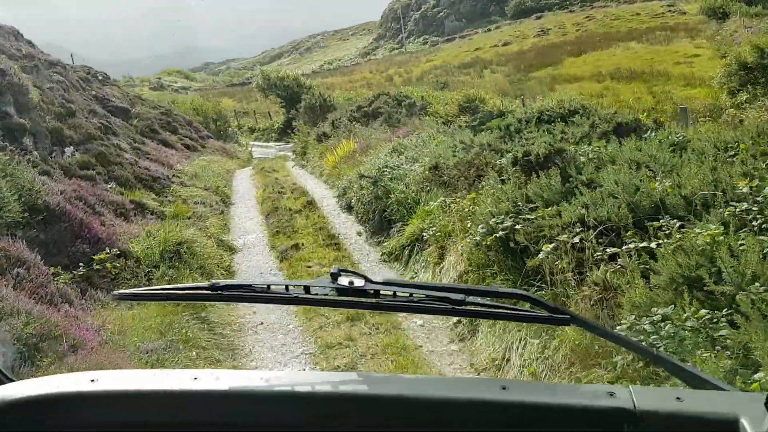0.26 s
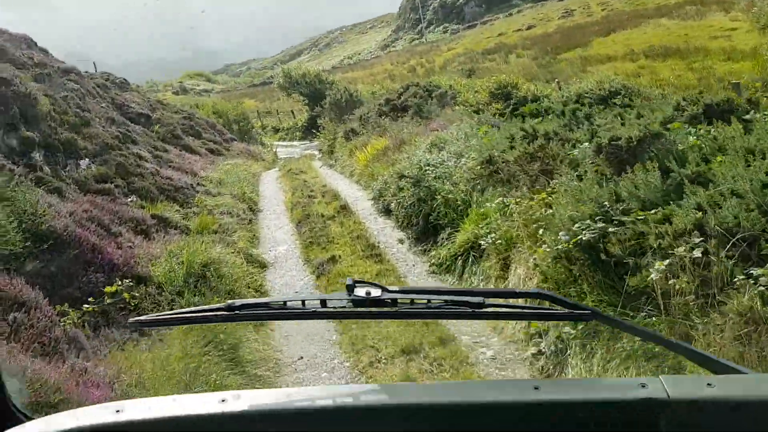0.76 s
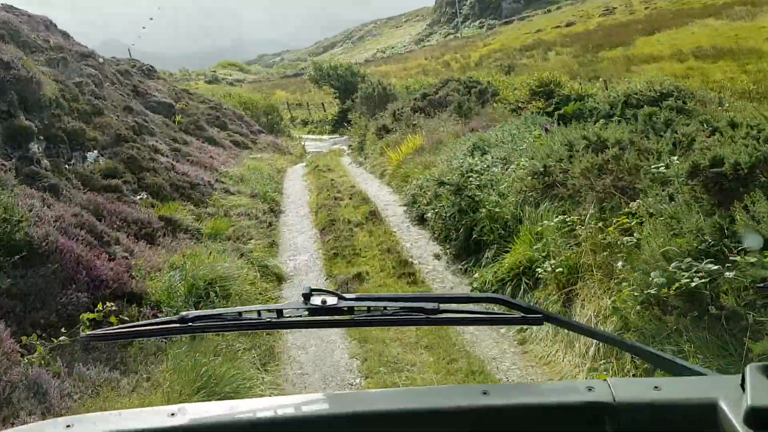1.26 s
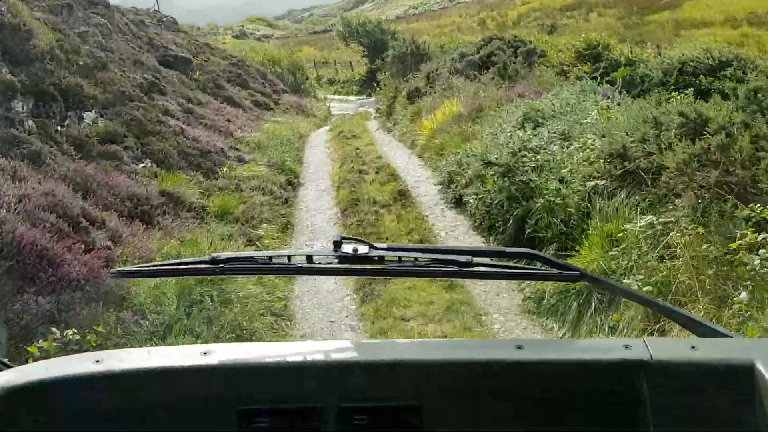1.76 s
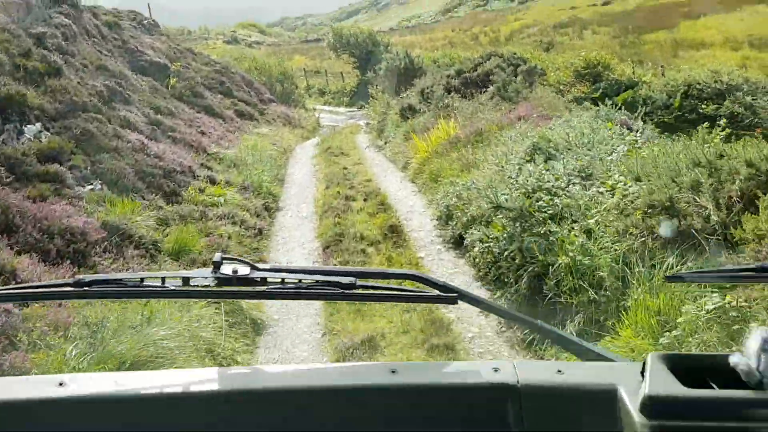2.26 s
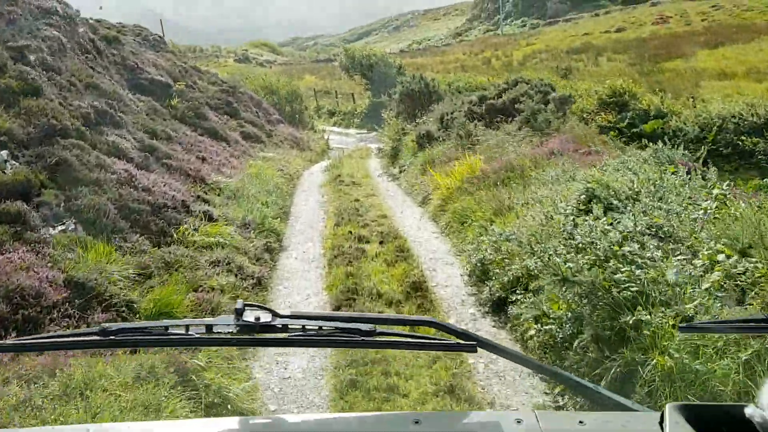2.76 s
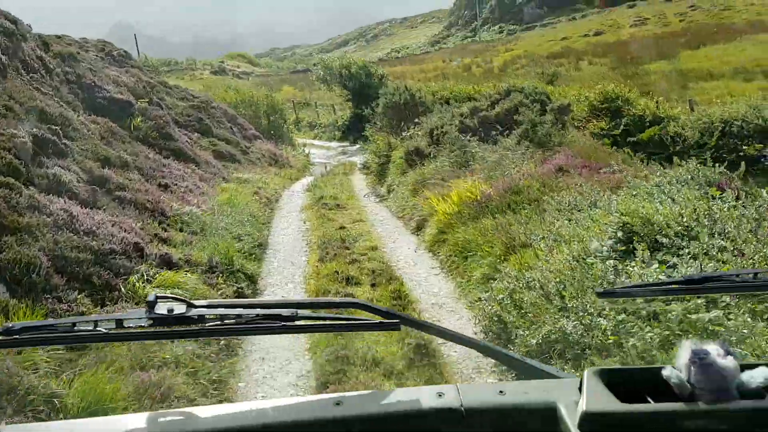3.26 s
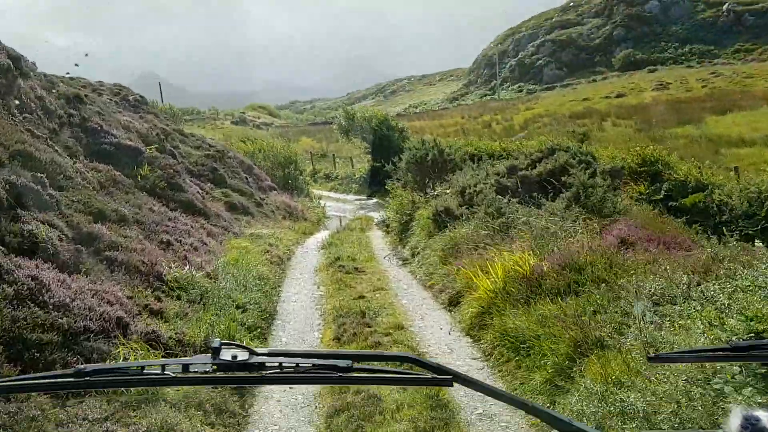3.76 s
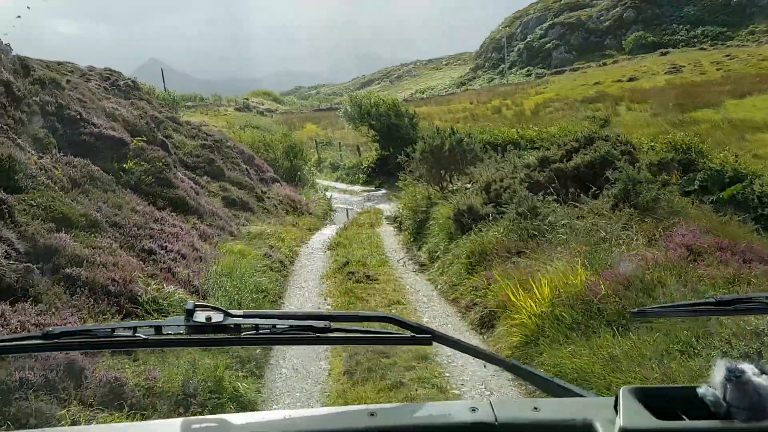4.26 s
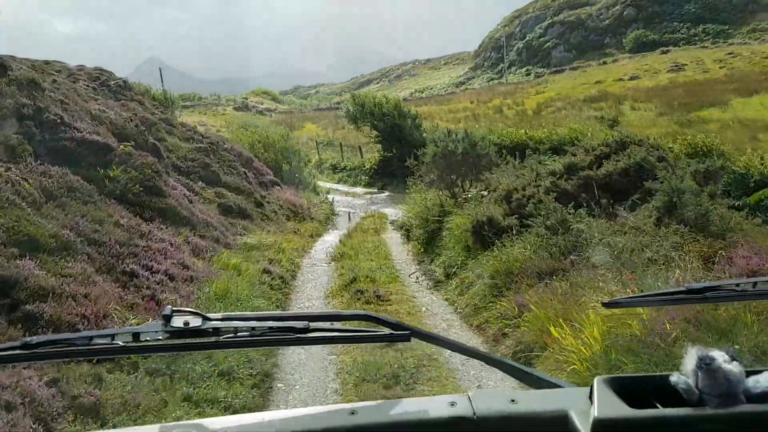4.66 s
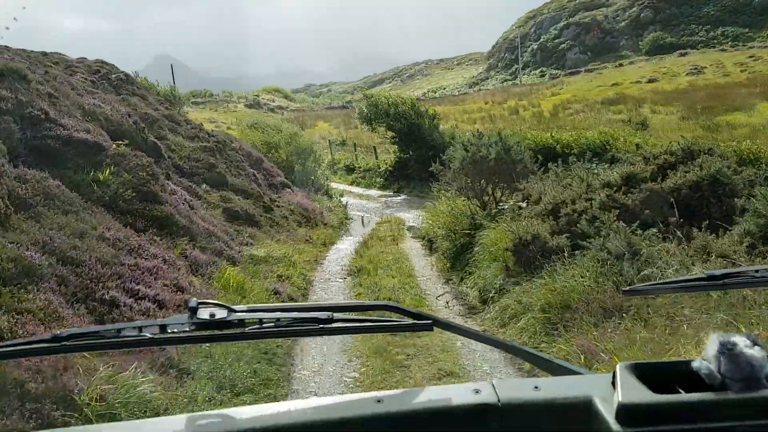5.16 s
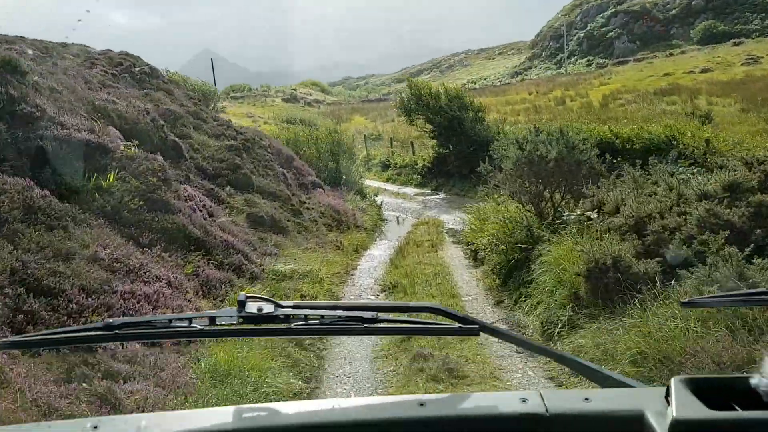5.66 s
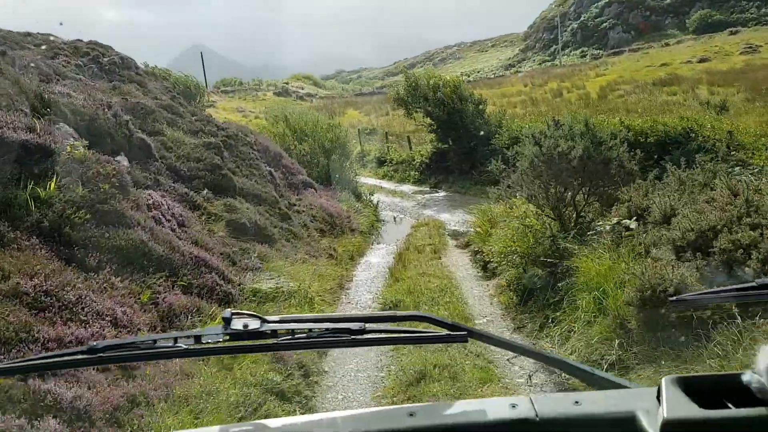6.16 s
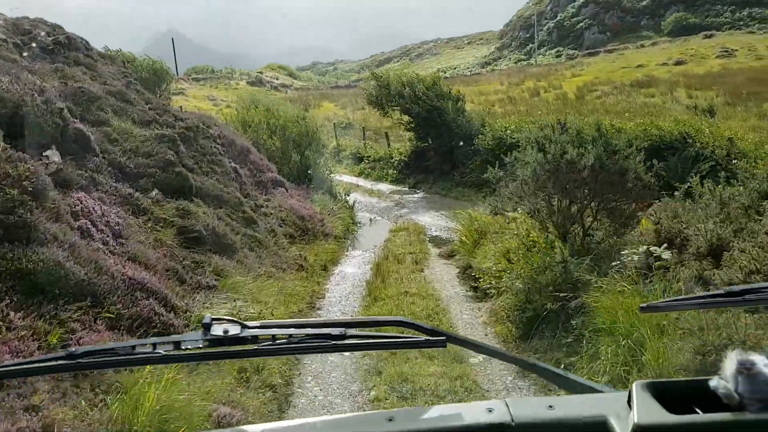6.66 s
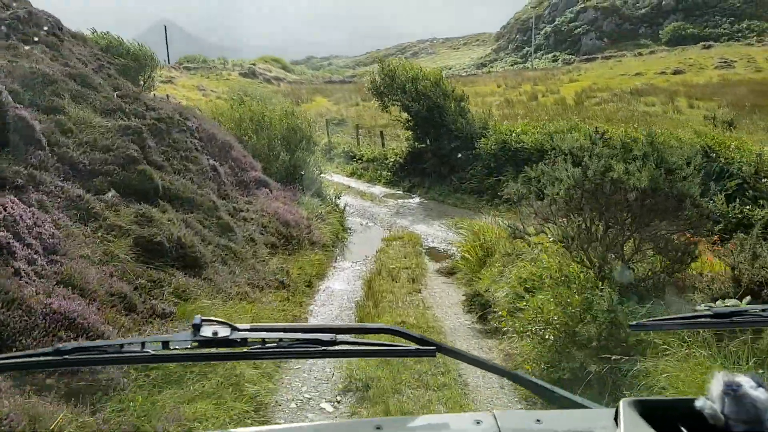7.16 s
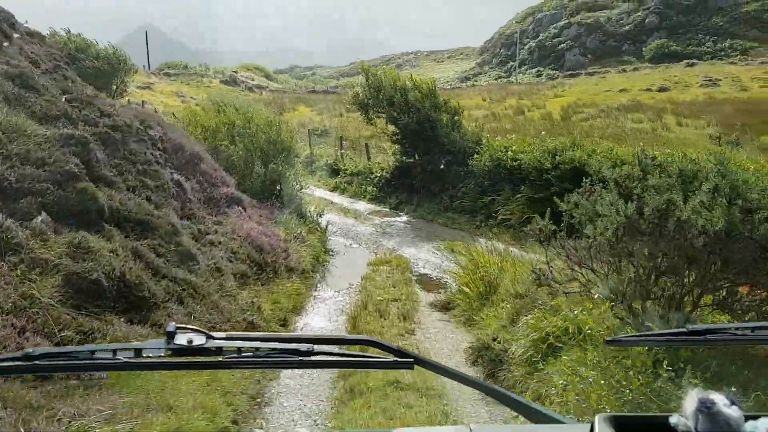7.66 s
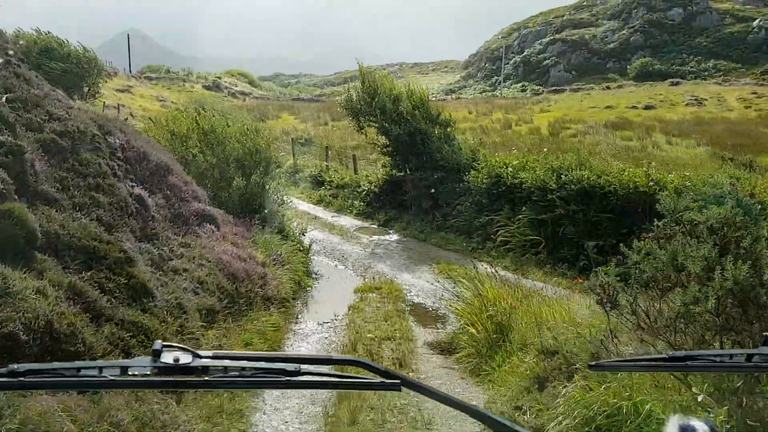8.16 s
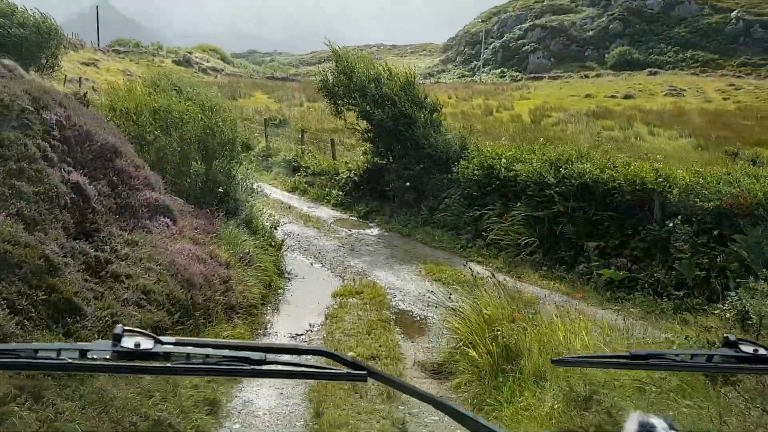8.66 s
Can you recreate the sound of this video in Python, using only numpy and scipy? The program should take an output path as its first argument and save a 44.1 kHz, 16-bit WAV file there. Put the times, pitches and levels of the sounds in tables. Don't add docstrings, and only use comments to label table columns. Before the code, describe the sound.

Inside a truck cab, a diesel engine booms and clatters along a rutted track, with bumps, trim rattles, small squeaks and foliage brushing the doors.

```python
import sys
import numpy as np
from scipy import signal
from scipy.fft import rfft, irfft, next_fast_len
from scipy.io import wavfile
from scipy.ndimage import uniform_filter1d, map_coordinates

SR = 44100
rng = np.random.default_rng(int(sys.argv[2]) if len(sys.argv) > 2 else 0)


def gain_from_db(level_db):
    decades = np.asarray(level_db, float) / 20
    return 10 ** decades


def generate_wav(signal):
    frames = np.transpose(np.atleast_2d(signal))
    scaled = np.clip(frames, -1, 1) * 32767
    pcm = np.round(scaled).astype(np.int16)
    wavfile.write(sys.argv[1], SR, pcm)


N = 392043
T = np.arange(N) / SR

# time in seconds, firing rate in Hz.
FIRING_RATE = [(0, 44.5), (.33, 36.3), (.78, 38.4), (1.08, 48.8), (1.35, 41.3), (1.65, 47.2), (2, 46.4),
               (2.48, 50), (2.8, 47.3), (3.32, 49.7), (4.4, 49.5), (5.25, 49), (6.15, 47.7), (6.8, 48.9),
               (7.2, 50.5), (7.86, 52), (8.08, 48.2), (8.89, 46.3)]
# centre in seconds, length in seconds, change in Hz.
SPEED_SAGS = [
    (.55, .12, 1.5),
    (.93, .07, 1.5),
    (3.63, .17, -2.9),
    (3.96, .12, 1.4),
    (4.88, .22, -2.9),
    (5.58, .12, -.9),
    (6.45, .15, 1.3),
]
# time in seconds, firing tone in dB.
EFFORT = [(0, -18.5), (1, -20), (2.2, -19.5), (2.6, -22.5), (3.1, -29), (3.4, -19.5), (4.07, -20),
          (4.7, -22), (5.06, -17), (5.4, -21.5), (5.7, -25), (6, -23.5), (6.3, -30), (6.65, -20),
          (7.2, -19.5), (7.8, -24.5), (8.3, -42), (8.89, -27.5)]
# centre in seconds, length in seconds, change in
# dB.
BOOM_DROPOUTS = [(.31, 0.12, -9), (.53, 0.095, -5), (.77, 0.029, -3), (1.19, 0.065, -28),
                 (1.43, 0.081, -3.5), (1.82, 0.11, -7), (2.35, .08, -6.5), (2.77, 0.11, -2.5),
                 (3.63, 0.085, -11), (3.86, 0.058, -7), (4.86, 0.1, -4.5), (5.23, 0.078, -13),
                 (8.58, 0.074, -1)]
# centre in seconds, length in seconds, lift in dB.
DOOR_BOOM = [(.05, 0.59, 13), (.54, 0.033, 12), (.9, 0.23, 13.5), (1.42, 0.18, 14.5), (1.92, 0.078, 9),
             (2.2, 0.055, 9), (2.78, 0.1, 8), (3.02, 0.22, 13), (3.6, 0.062, 4), (4.02, 0.12, 3),
             (4.29, .07, 6), (5.1, 0.32, 9.5), (5.5, 0.093, 6), (5.72, 0.047, 2), (6.2, 0.37, 8.5),
             (6.71, 0.021, -3), (7.15, 0.052, -1), (7.72, 0.44, 6), (8.03, 0.061, 0), (8.36, 0.074, 3.5)]
# centre in seconds, length in seconds, lift in dB.
ROOF_BOOM = [(.14, 0.17, 11.5), (.44, 0.1, 13.5), (.99, 0.088, 13.5), (1.48, 0.091, 16.5),
             (1.84, 0.15, 8.5), (2.09, 0.033, 7), (2.48, 0.11, 13.5), (3.02, 0.13, 12), (3.38, 0.075, 12),
             (3.63, 0.056, 8), (4.05, 0.099, 4), (4.45, 0.18, 9.5), (4.73, 0.053, 8.5), (5.58, 0.16, 15.5),
             (5.83, 0.048, 9), (6.24, 0.18, 12), (6.73, 0.082, 12), (7.04, 0.075, 11), (7.27, 0.075, 5),
             (7.6, .07, 8), (7.81, 0.079, 8), (8.28, 0.27, 8.5), (8.58, 0.046, 4), (8.8, 0.13, 7)]
WEAK_MULTIPLES = [1 / 3, 1 / 2, 4 / 3, 3 / 2, 5 / 3, 7 / 3, 5 / 2, 8 / 3, 10 / 3, 7 / 2, 11 / 3, 4, 23 / 3,
                  8, 25 / 3, 28 / 3]
WEAK_LEVELS = [-49, -48, -47, -42, -47, -47, -45, -46, -50, -47, -52, -48, -49, -50, -52, -55]
# centre in seconds, length in seconds, lift in dB.
DASH_HUM = [(1.2, 0.29, 5), (2.3, 0.37, 4), (3.05, 0.1, 9), (3.6, 0.16, 7.5), (4.6, 0.23, 5.5),
            (5.3, 0.29, 4.5), (6.2, 0.16, 9), (6.7, .2, 7), (7.5, 0.056, 7.5), (7.75, .1, 10),
            (8.25, .15, 1)]
# centre in seconds, length in seconds, lift in dB.
GLASS_HUM = [
    (1.08, 0.12, 10),
    (2.2, 0.11, 5),
    (3.3, .15, 1),
    (4.25, .35, 9.5),
    (5.1, .2, 2.5),
    (6, 0.27, 9),
    (6.7, 0.22, 5.5),
    (7.3, .3, 8),
    (8.1, 0.091, 2),
]
CYLINDER_KNOCK = [3.5, 2.5, 0.5, 2.5, 3.5, -3]
# frequency in Hz, density in dB per Hz.
BLOCK_COLOUR = [(290, -32), (500, -23.5), (607, 2), (736, -9.5), (810, -7.5), (893, -3), (1240, -0.5),
                (1340, 0.5), (1950, -13), (2640, -12.5), (4810, -31), (6500, -37.5), (8450, -60),
                (14300, -120)]
# frequency in Hz, width in Hz, lift in dB.
BLOCK_MODES = [(731, 37, 11.5), (887, 37, 6), (1023, 57, 3.5), (1320, 40, 0.5), (1800, 19, 5),
               (2130, 40, 4.5), (2604, 41, 5.5), (2800, 24, -1.5), (2826, 25, 8.5), (3300, 30, 6),
               (4070, 32, 6)]
# frequency in Hz, width in Hz, level in dB.
INJECTOR_PIPES = [(1223, 110, -2.5), (2100, 96, -7), (2650, 63, -13), (2782, 137, 2.5), (2920, 73, -14),
                  (3250, 88, -4.5)]
# centre in seconds, length in seconds, lift in dB.
THROTTLE_STABS = [
    (.9, .85, 1.5),
    (2.1, 0.52, 4),
    (2.9, 0.072, 8),
    (3.3, 0.2, 5.5),
    (4.55, 0.22, 3.5),
    (5.8, 0.41, 8.5),
    (6.5, .15, 6.5),
    (8.3, .32, -1),
]
# frequency in Hz, level in dB, 60 dB decay in seconds.
TAPPET_MODES = [(2160, -9, .025), (3580, -1, .03), (3740, -6, .022)]
# centre in seconds, length in seconds, lift in dB.
COASTING = [
    (3.7, .2, 4),
    (5.6, .25, 3),
    (8.38, .5, 9),
]
# start in seconds, length in seconds, frequency in Hz, level in dB.
GEAR_STRANDS = [(2.7, .7, 3270, -64), (2.9, .7, 2920, -60), (3.8, 0.78, 3250, -64), (4.3, 0.48, 2780, -57),
                (5.3, 1.2, 3230, -58), (5.6, 0.34, 2860, -62), (6.3, .4, 2770, -58),
                (7.2, 1.4, 3210, -65.5), (7.4, 1.7, 2140, -51.5), (7.8, .55, 1590, -54),
                (8, 1.1, 2325, -54), (5.9, .5, 2120, -61)]
# time in seconds, level in dB.
SHAKING = [(0, -0.5), (.35, -1), (.96, 3.5), (1.26, 0.5), (2.97, 1), (3.6, 1.4), (4.01, 0.7), (4.48, 2),
           (5.07, 1), (6.49, 1.7), (7.43, 1), (7.7, 1.5), (8.05, -0.5), (8.4, -1), (8.89, -4)]
# centre in seconds, length in seconds, lift in dB.
STONES = [
    (0, 0.18, 6),
    (.55, 0.12, 3.5),
    (.96, 0.28, 3.5),
    (1.63, 0.15, 3),
    (3.7, 0.18, 2),
]
# frequency in Hz, density in dB per Hz.
BODY_COLOUR = [(8, -15.5), (24, -8.5), (35, 4.5), (60, 3), (85, 0), (150, 0), (215, -10.5), (260, -9),
               (370, -5.5), (520, -14), (620, -14.5), (800, -18), (1500, -54)]
# start in seconds, peak in dB, brightness in dB per octave, floor-pan ring in dB,
# pitch of the shell as a ratio to its rest.
BUMPS = [(.028, -13.5, 0, -17, 1.01), (.047, -21, -1.5, -11, 1.12), (.061, -28.5, -5, 15, 1),
         (.632, -32, 2.5, -10, 1), (.867, -17, -1.5, -10, 0.97), (0.891, -29, -3, 15.5, 1),
         (.914, -32, -3, 13, 1), (.962, -29, 1, 5, 1.3), (1.466, -32.5, 2, 0, 1.05), (2.196, -32, 3, 5, 1),
         (4.35, -33, 1.5, -9, 1.04), (5.544, -23, -.5, -2, 1.09), (5.56, -19, -5, 3, 0.98),
         (5.583, -24.5, -0.5, 8, 1.22)]
# frequency in Hz, level in dB, 60 dB decay in seconds.
SHELL_MODES = [(140, 6, 0.087), (194, -2, .045), (264, 0.5, 0.14), (318, -9, 0.16), (392, -6, 0.074),
               (495.4, -6.5, 0.13), (574, -0.5, 0.088), (694, -5, 0.095), (842, -10, .11),
               (1211, -6.5, 0.11), (1327, -10, 0.056)]
# frequency in Hz, level in dB.
JOLT_COLOUR = [(80, -14), (140, 14.5), (300, -3), (700, -1.5), (1300, -10), (3000, -21), (4500, -62)]
# start in seconds, peak in dB, mid band in dB, top band in dB.
RATTLES = [(.133, -40.5, 8, -11), (.174, -51, -6, -4.5), (.2074, -49, -2, -5.5), (.2823, -47.5, 7, -10),
           (.3621, -51, 9, -9), (.4564, -48, 2, -10), (.4838, -52, 8, -10.5), (.5144, -42.5, -9, -8),
           (0.641, -30, 13, -23), (0.971, -35, 9, -20), (1.0044, -53.5, 12, -12), (1.2111, -39, 8, 0),
           (1.6034, -45.5, 22, -21), (2.196, -37, 13, -27), (2.5744, -56, 27, -18), (3.1014, -43, -9, -11),
           (3.353, -38.5, 2, -11), (3.4308, -44.5, 19, -5.5), (3.472, -41, -5, -11),
           (3.774, -36.5, 7, -18.5), (3.8417, -49, -1, -21), (4.0168, -41, -12, -13.5),
           (5.107, -47.5, 21, -32), (5.5873, -28.5, -2, -11), (5.5974, -49, -12, -22),
           (6.5494, -45.5, -7, -6), (8.51, -39.5, 8.5, -17)]
# frequency in Hz, level in dB.
TRIM_MID = [(600, -28), (1000, -7), (1400, 9.5), (2050, 9.5), (2500, 4), (3000, -2), (4200, -8.5),
            (6000, -31.5)]
# frequency in Hz, level in dB.
TRIM_HIGH = [(2500, -4), (4200, 5), (6000, 3.5), (8300, 2.5), (9500, -7.5), (11000, -21)]
# frequency in Hz, level in dB.
TRIM_TOP = [(8500, -21), (9500, -6.5), (12000, 5), (15700, -3.5)]
# start in seconds, frequency in Hz, level in dB, length in seconds.
PINGS = [(.615, 310, -29, .035), (.642, 2650, -29, .009), (.643, 4300, -37, .009), (.647, 1480, -34, .012),
         (.652, 2020, -31, .018), (1.22, 735, -39, .05), (1.466, 400, -29, .025), (1.601, 2200, -31, .008),
         (1.604, 2550, -30, .008), (1.604, 5000, -37, .006), (1.604, 3700, -39, .006),
         (1.609, 1520, -29, .008), (1.93, 285, -33, .08), (1.815, 740, -32, .045), (2.822, 1065, -30, .035),
         (3.75, 1080, -39, .05), (3.845, 9350, -56, .035), (2.196, 2250, -32, .01), (3.434, 5300, -41, .01),
         (5.105, 5500, -44, .01), (5.106, 4150, -40, .01), (5.118, 1050, -31, .012), (5.345, 730, -32, .05),
         (5.92, 720, -35, .06), (8.866, 2500, -43, .022)]
# start in seconds, length in seconds, level in dB, brightness in dB.
SWISHES = [(0.166, .07, -76, -3), (0.328, 0.091, -64, -0.5), (0.446, 0.22, -62.5, -2.5),
           (0.63, .3, -58.5, -3.5), (0.927, 0.16, -57, -1.5), (1.123, 0.32, -66, -2),
           (1.32, 0.1, -67.5, -4), (1.84, .08, -68, -4), (2.2, .2, -76, 7), (2.455, 0.26, -66.5, -1),
           (3.3, 0.38, -68.5, -5), (4.6, 0.2, -67.5, 2.5), (4.84, .17, -65, 1.5), (5.07, 0.44, -70, -2),
           (7.627, 0.24, -84, 10)]
# frequency in Hz, density in dB per Hz.
AIR_COLOUR = [(3000, 12), (5000, -13), (7000, 6), (8100, 8.5), (8700, 6), (9600, -50), (11500, -23),
              (15700, -5)]
# frequency in Hz, left over right in dB.
PORT_BALANCE = [(60, 3.5), (110, 3.5), (200, -2), (380, -0.5), (700, -3.0), (1290, -4.0), (2380, -3),
                (4400, -2), (8120, -2.5), (15000, 2.5)]
# frequency in Hz, likeness from 0 to 1.
PORT_LIKENESS = [(40, 0.97), (130, 0.66), (300, 0.91), (640, 0.43), (1400, 0.28), (4000, 0.11),
                 (15000, 0.04)]
# frequency in Hz, lag of the left in seconds.
PORT_LAG = [(50, 0.00048), (200, 0.00029), (600, 0.00011), (1300, 0.00031), (15000, 0.000292)]


def unit(x):
    return x / np.sqrt(np.mean(x ** 2) + 1e-20)


def along(points, hz):
    f, v = np.transpose(points)
    return np.interp(np.log(hz + 1), np.log(f + 1), v)


def curve(rows):
    s, value = np.transpose(rows)
    return np.interp(T, s, value)


def swells(rows):
    coarse = T[::64]
    bells = sum(size * np.exp(-((coarse - s) / max(length, .02)) ** 2) for s, length, size in rows)
    return np.interp(T, coarse, bells)


def wobble(rate):
    coarse = T[::64]
    knots = rng.standard_normal(int(N * rate / SR) + 4)
    return np.interp(T, coarse, map_coordinates(knots, [coarse * rate]))


def filtered(x, response):
    edge = 2048
    m = next_fast_len(N + 4 * edge)
    wide = np.concatenate([x[..., edge:0:-1], x, x[..., :-edge:-1]], axis=-1)
    spectrum = rfft(wide, m) * response(np.fft.rfftfreq(m, 1 / SR))
    return irfft(spectrum, m)[..., edge:edge + N]


def patchy_noise():
    z = rng.standard_normal((2, 257, N // 256 + 3, 2)) @ [1, 1j]
    field = uniform_filter1d(rng.standard_normal(z.shape[1:]), size=5, axis=0)
    field = uniform_filter1d(field, size=10, axis=1)
    patch_db = 1.0 * unit(field)
    return signal.istft(z * gain_from_db(patch_db), window="cosine", nperseg=512)[1][:, :N]


def hiss(colour, white, modes=()):
    def response(hz):
        lift_db = sum(db / (1 + (2 * (hz - c) / w) ** 2) for c, w, db in modes)
        return gain_from_db(along(colour, hz) + lift_db)
    return unit(filtered(white, response))


def decaying(hz, db, t60, t, phase=0):
    return gain_from_db(db - 60 * t / t60) * np.sin(2 * np.pi * hz * t + phase)


def add(track, s, sound):
    part = track[..., round(s * SR):][..., :sound.shape[-1]]
    part += sound[..., :part.shape[-1]]


def firings():
    count = np.cumsum(curve(FIRING_RATE) + swells(SPEED_SAGS)) / SR
    first_cylinder_s = 8.574
    return count - count[round(first_cylinder_s * SR)] + 600


def exhaust():
    angle = 2 * np.pi * firings()
    effort_db = curve(EFFORT)

    booms_db = [effort_db + swells(BOOM_DROPOUTS), -39.5 + swells(DOOR_BOOM), -42.5 + swells(ROOF_BOOM)]
    strong = np.zeros(N)
    for k, db in enumerate(booms_db):
        twist = .7 + .1 * k * wobble(3)
        strong += gain_from_db(db + 3.0) * np.sin((k + 1) * angle + twist)

    def tone(multiple, db, sway):
        drift = 2 * np.pi * rng.random() + .4 * wobble(4)
        return gain_from_db(db + sway * wobble(4)) * np.sin(multiple * angle + drift)

    follow_db = 0.16 * (effort_db + 18.5)
    weak = sum(tone(k, db + 1 + follow_db, 2.5) for k, db in zip(WEAK_MULTIPLES, WEAK_LEVELS))
    weak = weak + tone(5, -48.5 + swells(DASH_HUM) + 3.5, 1.25)
    weak = weak + tone(7, -50 + swells(GLASS_HUM) + 3.5, 1.25)
    return np.array([strong + weak, .12 * weak + .05 * np.roll(strong, 300)])


def clatter():
    count = firings()
    which = count.astype(int)
    scatter_db = 1.15 * rng.standard_normal(which.max() + 1)[which]
    size_db = np.take(CYLINDER_KNOCK, which % 6) + scatter_db
    knock = unit(uniform_filter1d(gain_from_db(size_db - 10 * (count % 1)), size=160))
    white = rng.standard_normal((2, N))

    def knocked_share(hz):
        return along([(500, 0.54), (1500, 0.36), (3000, 0.76), (6000, 0.59)], hz).clip(0, 1)

    steady = unit(patchy_noise())
    mix = filtered(knock * white, knocked_share)
    mix = mix + filtered(steady, lambda hz: np.sqrt(1 - knocked_share(hz) ** 2))
    block = gain_from_db(-38.5 + curve(SHAKING)) * hiss(BLOCK_COLOUR, mix, BLOCK_MODES)

    def pipes(f):
        return sum(gain_from_db(db) * (1j * f * w / (c * c - f * f + 1j * f * w)) ** 2 for c, w, db in INJECTOR_PIPES)

    spurts = knock ** 1.5 * gain_from_db(1.5 * wobble(6)) * white[::-1]
    return block + gain_from_db(-57.5 + swells(THROTTLE_STABS)) * unit(filtered(spurts, pipes))


def tappet():
    out, t = np.zeros((2, N)), T[:SR // 20]
    level_db = -52 + swells(COASTING)
    tick = (1 - np.exp(-t / .001)) * sum(decaying(hz, db, t60, t) for hz, db, t60 in TAPPET_MODES)
    for i in np.flatnonzero(np.diff(firings() // 6)):
        strike = gain_from_db(level_db[i] + rng.standard_normal()) * tick
        add(out, T[i] - .003, strike * [[1], [.5]])
    return out


def gear_strands():
    out, tremble, sway = np.zeros((2, N)), 1.6 * wobble(130), gain_from_db(3 * wobble(25))
    for k, (s, length, hz, db) in enumerate(GEAR_STRANDS):
        t = T[:int(length * SR)]
        part = slice(k * 5000, k * 5000 + len(t))
        shape = np.sqrt(np.abs(np.sin(np.pi * t / length))) * sway[part]
        add(out[0], s, gain_from_db(db + 2.5) * shape * np.sin(2 * np.pi * hz * t + tremble[part]))
    return out


def rumble():
    level_db = -31.5 + 0.5 * curve(SHAKING) + swells(STONES) + 0.32 * wobble(6.5)
    return gain_from_db(level_db) * hiss(BODY_COLOUR, patchy_noise())


def bumps():
    out, jolt, t = np.zeros((2, N)), np.zeros(N), T[:SR // 3]
    pan_hz, pan_level_db, pan_t60 = SHELL_MODES[0]
    for s, db, bright_db, pan_db, pitch in BUMPS:
        shell = np.zeros(len(t))
        for hz, level_db, t60 in SHELL_MODES[1:]:
            struck_db = level_db + bright_db * np.log2(hz / 270) + 1.5 * rng.standard_normal()
            shell += decaying(hz * pitch, struck_db, t60, t, 2 * np.pi * rng.random())
        shell *= 1.3 * (1 - np.exp(-t / .006))
        floor_pan = 1.8 * decaying(pan_hz, pan_db + pan_level_db, pan_t60, t) * (1 - np.exp(-t / .012))
        add(out[0], s, gain_from_db(db - 0.5) * shell + gain_from_db(db) * floor_pan)
        jolt_db = db + 3.0 + 3.44 * bright_db - 60 * t / 0.085
        add(jolt, s, gain_from_db(jolt_db) * (1 - np.exp(-t / 0.0039)))
    return out + jolt * hiss(JOLT_COLOUR, rng.standard_normal((2, N)))


def rattles():
    bands, t = np.zeros((3, N)), T[:SR // 6]
    mid, high, top = bands
    fade_db = -60 * t / 0.072
    for s, db, mid_db, top_db in RATTLES:
        contacts = gain_from_db(1.8 * np.repeat(rng.standard_normal(len(t) // 70), 70))
        blow = contacts * gain_from_db(db + 1) * (1 - np.exp(-t / .006))
        add(mid, s - .003, blow * gain_from_db(mid_db - 6.5 + 0.71 * fade_db))
        add(high, s - .003, blow * gain_from_db(fade_db - 4.5))
        add(top, s - .003, blow * gain_from_db(top_db + 1.07 * fade_db))
    return bands


def brush():
    bands = np.zeros((3, N))
    for s, length, db, bright_db in SWISHES:
        shape = np.sqrt(np.abs(np.sin(np.pi * T[:int(length * SR)] / length)))
        add(bands[1:], s, shape * gain_from_db([[db - bright_db], [db + bright_db]]))
    return bands * gain_from_db(1.7 * wobble(37) + 2 * wobble(300))


def trim(drive):
    white = rng.standard_normal((2, N))
    return sum(shape * hiss(colour, white) for shape, colour in zip(drive, [TRIM_MID, TRIM_HIGH, TRIM_TOP]))


def pings():
    out = np.zeros((2, N))
    for s, hz, db, length in PINGS:
        t = T[:int(length * SR)]
        shape = np.sin(np.pi * np.sqrt(t / length))
        add(out[0], s, gain_from_db(db) * shape * np.sin(2 * np.pi * hz * t))
    return out


def air():
    low_whistle = gain_from_db(-83) * np.sin(2 * np.pi * 8050 * T + 1.5 * wobble(150))
    high_whistle = gain_from_db(-79) * np.sin(2 * np.pi * 14560 * T + 2 * wobble(60))
    fan = gain_from_db(-62.0 + .3 * wobble(1.3)) * hiss(AIR_COLOUR, patchy_noise())
    return fan + (low_whistle + high_whistle) * [[1], [.3]]


def ports(pair):
    def blend(hz):
        turn = np.arccos(np.clip(along(PORT_LIKENESS, hz), 0, 1)) / 2
        return np.array([np.cos(turn), np.sin(turn)])

    def placement(hz):
        left = gain_from_db(along(PORT_BALANCE, hz) / 2) * np.exp(-1j * np.pi * hz * along(PORT_LAG, hz))
        return np.array([left, 1 / left])

    shared, own = filtered(pair, blend)
    return filtered(np.array([shared + own, shared - own]), placement)


def scene():
    engine = exhaust() + clatter() + tappet() + gear_strands()
    body = rumble() + bumps() + trim(rattles() + brush()) + pings()
    return ports(engine + body + air())


def top_cut(x):
    return signal.sosfilt(signal.butter(12, 15720, fs=SR, output="sos"), x)


def record(dry):
    fade = np.clip(np.minimum(T, T[::-1]) / .004, 0, 1)
    return top_cut(dry * fade)


dry = scene()
out = record(dry)
generate_wav(out)
```